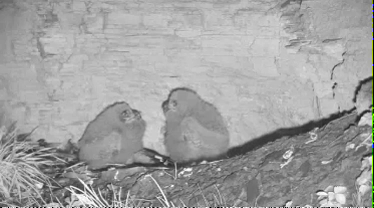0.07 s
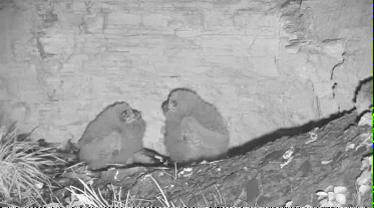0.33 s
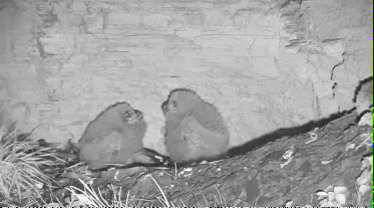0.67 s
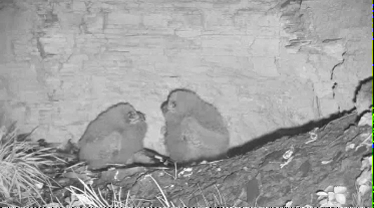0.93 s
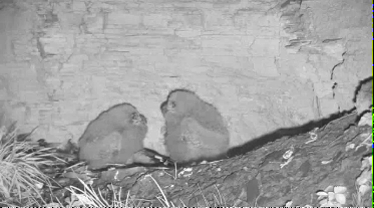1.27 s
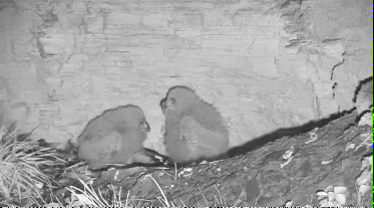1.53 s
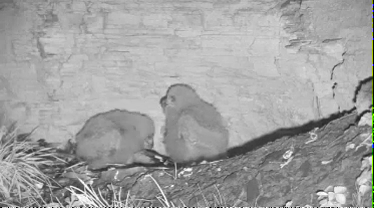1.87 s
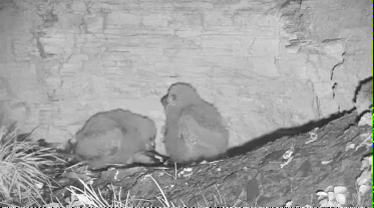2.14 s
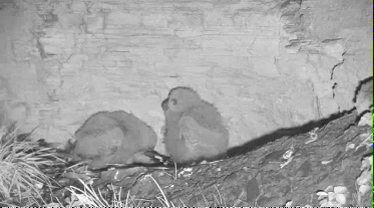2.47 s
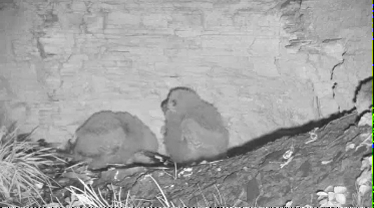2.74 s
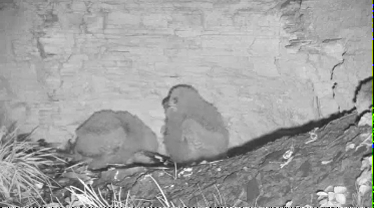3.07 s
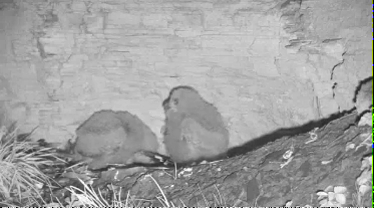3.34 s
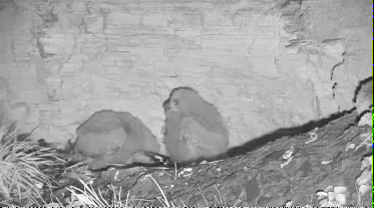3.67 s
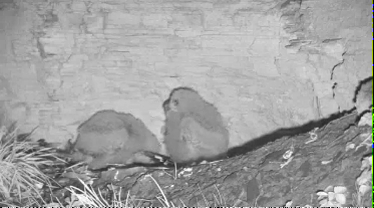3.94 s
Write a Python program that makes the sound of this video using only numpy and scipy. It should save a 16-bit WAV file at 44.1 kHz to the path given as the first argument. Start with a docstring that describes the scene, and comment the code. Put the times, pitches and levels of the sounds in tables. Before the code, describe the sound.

Songbirds sing some way off near a cliff ledge: a few chirps, then a quick run of whistles and trills, then harsh rasps. The song echoes lightly over a far chorus, with faint microphone hiss and hum.

```python
"""On a cliff ledge, songbirds call some way off. One sings whistles (frequency glides) that break
into trills (amplitude and frequency modulation), with harsh rasps (air puffs exciting a resonance)
before and after. Reflection from rock and trees returns the song over a far chorus.
The fixed microphone adds steady hiss, mains hum and a thin rectifier buzz."""
import sys
import numpy as np
from scipy import signal
from scipy.fft import rfft, irfft
from scipy.io import wavfile
from scipy.ndimage import uniform_filter1d

SR = 44100
rng = np.random.default_rng(int(sys.argv[2]) if len(sys.argv) > 2 else 0)


def unload_audio(sound):
    """Save the sound as a 16-bit wav file, at the path given as the first command line argument."""
    columns = np.transpose(np.atleast_2d(sound))
    # keep every value between -1 and 1, then stretch to whole-number steps
    steps = np.round(np.clip(columns, -1, 1) * 32767)
    wavfile.write(sys.argv[1], SR, steps.astype(np.int16))


N = 176400
T = np.arange(N) / SR


# Slurred pure notes: onset t/s, duration t/s, first f/Hz, middle f/Hz, last f/Hz, level/dB
WHISTLE_NOTES = [ (0.182, 0.018, 3700, 3900, 3950, -56), (.224, 0.017, 3800, 3780, 3820, -55),
                 (0.266, 0.016, 3950, 4030, 4140, -57), (0.302, .012, 4500, 4470, 4430, -60),
                 (0.389, 0.022, 3950, 4080, 3980, -58), (0.404, 0.03, 2950, 2882, 3000, -50),
                 (.442, 0.021, 2930, 2847, 2850, -44), (0.498, 0.056, 2270, 2207, 2260, -56),
                 (.636, 0.031, 3590, 3580, 3570, -58), (0.639, 0.027, 2870, 2807, 2800, -53.5),
                 (.692, 0.068, 2870, 2880, 2900, -50), (.835, 0.036, 2860, 2904, 2900, -57.5),
                 (.928, 0.029, 2853, 2862, 2800, -51), (1.226, 0.017, 2760, 2880, 2920, -54.5),
                 (1.407, .036, 2110, 2188, 1900, -49), (1.475, 0.0097, 2060, 1880, 1810, -51.5),
                 (1.5, 0.037, 3300, 3220, 3140, -61), (1.559, 0.065, 1980, 2080, 2055, -53.5),
                 (1.615, 0.082, 2070, 2004, 1940, -51), (1.614, 0.061, 2580, 2413, 2316, -41),
                 (1.677, 0.037, 2372, 2750, 2606, -39.5), (1.717, 0.021, 2200, 2320, 2320, -47.5),
                 (1.749, 0.022, 2180, 2357, 2440, -43.5), (1.772, 0.069, 2536, 2512, 2523, -44.5),
                 (1.834, 0.0627, 2489, 2496, 2530, -40), (1.784, .028, 3600, 3620, 3500, -62.5),
                 (1.865, 0.02, 4110, 4000, 4040, -59.5), (1.926, 0.021, 4030, 4240, 3970, -55),
                 (2.01, 0.013, 5000, 4860, 4860, -59.5), (2.018, 0.027, 2486, 2622, 2970, -46),
                 (2.272, .085, 1650, 1630, 1643, -62), (2.594, 0.071, 1643, 1616, 1603, -56.5),
                 (2.678, .06, 1540, 1486, 1485, -62.5), (2.743, 0.028, 1480, 1444, 1420, -56.5),
                 (2.789, 0.043, 2694, 2716, 2690, -51.5), (2.837, .06, 2700, 2890, 2924, -52),
                 (3.065, 0.011, 3460, 3870, 4530, -52.5), (3.23, .024, 3120, 2956, 3000, -43),
                 (3.463, 0.0041, 3020, 3000, 3040, -31), (3.848, 0.069, 4240, 4310, 4270, -66)]
def whistle(length, first_hz, middle_hz, last_hz, db):
    """Frequency glide: a pure tone follows a parabola through three pitches."""
    _, progress, envelope = syllable(length)
    parabola = np.polyfit([0, .5, 1], [first_hz, middle_hz, last_hz], 2)
    return amp(db) * envelope * unit(tone(np.polyval(parabola, progress)))


# Trilled notes: onset t/s, duration t/s, first f/Hz, last f/Hz, level/dB,
# modulation f/Hz, deviation f/Hz, amplitude modulation depth (0-1)
TRILL_NOTES = [ (0.037, 0.041, 3112, 2930, -37, 130, 70, 0.57), (0.087, .03, 2867, 2820, -41, 99, 70, 0.4),
               (1.554, 0.064, 2955, 2620, -42.5, 54, 109, 0.1),
               (1.769, 0.12, 1933, 1625, -55.5, 61, 60, 0.3),
               (1.872, 0.045, 2120, 2270, -49, 72.7, 120, 0.9), (1.9, 0.072, 2265, 2184, -44, 72, 99, 0.2),
               (2.037, 0.075, 2884, 2983, -40, 78, 173, 0.54),
               (2.185, 0.072, 2925, 3060, -42.5, 90, 219, 0.5),
               (2.287, 0.09, 2012, 1990, -48, 66, 59.5, 0.14),
               (2.368, .11, 2017, 1886, -44.5, 49.4, 30, 0.5),
               (2.361, 0.087, 2980, 3010, -46.5, 88, 278, 0.65),
               (2.48, 0.058, 1869, 1805, -54.5, 62, 25, .4),
               (2.489, 0.073, 2790, 2780, -49.5, 67, 111, 0.5),
               (2.561, .13, 2857, 2927, -52.5, 62, 232, 0.15), (3.248, 0.037, 2770, 2644, -47, 72, 101, .4),
               (3.284, 0.028, 2806, 2775, -41.5, 92, 120, 0.1)]
def trill(length, first_hz, last_hz, db, rate_hz, deviation_hz, depth):
    """Amplitude and frequency modulation at one rate: each pulse sweeps upward as it fades."""
    t, progress, envelope = syllable(length)
    phase = 2 * np.pi * rate_hz * t + 0.39 * wander(len(t), hz=51)
    carrier_hz = first_hz + (last_hz - first_hz) * progress
    hz = carrier_hz - deviation_hz * np.sin(phase - 0.41)  # the sweep lags the pulse
    pulses = 1 - depth * np.cos(phase)
    return amp(db) * envelope * unit(pulses * tone(hz))


# Harsh calls: onset t/s, duration t/s, first f/Hz, last f/Hz, level/dB, bandwidth per stage f/Hz
RASP_CALLS = [ (0.033, 0.035, 3180, 3050, -43, 600), (0.074, 0.036, 2900, 2800, -46, 597),
              (0.114, 0.082, 2840, 2830, -46.5, 540), (.21, .12, 2930, 2910, -52.5, 400),
              (0.493, 0.01, 4170, 3500, -54, 800), (2.102, 0.0078, 4300, 4300, -53, 610),
              (2.195, 0.01, 4460, 3900, -55, 596), (2.329, .016, 3750, 3660, -55.5, 400),
              (2.385, 0.028, 3820, 3800, -57, 400), (2.3, 0.22, 2520, 2510, -55.5, 500),
              (2.569, 0.21, 2490, 2610, -54.5, 500), (2.849, .18, 2540, 2520, -56.5, 400),
              (3.03, .19, 2920, 2820, -56, 353), (3.076, .14, 3960, 3950, -58.5, 900),
              (3.282, .04, 3600, 3500, -51, 250), (3.336, .06, 2850, 3000, -45.5, 450),
              (3.365, 0.061, 3670, 3580, -51, 500), (3.396, .095, 2950, 3040, -41.5, 450),
              (3.44, 0.15, 2320, 2410, -52.5, 700), (3.491, 0.096, 3020, 2850, -42.5, 460),
              (3.573, 0.068, 3630, 3600, -50, 800), (3.602, 0.11, 3070, 3250, -50, 450),
              (3.703, 0.085, 2920, 3260, -48, 396)]
def rasp(length, first_hz, last_hz, db, width_hz, puff_hz=125, air_width_hz=1300):
    """Source and filter: uneven puffs of air excite a resonance of the bird's throat."""
    t, progress, envelope = syllable(length)
    cycles = np.cumsum(puff_hz * (1 + .3 * wander(len(t), hz=100))) / SR
    puffs = np.exp(-(cycles % 1) / 0.56) * rng.standard_normal(SR // 2)[:len(t)]
    hz = first_hz + (last_hz - first_hz) * progress
    ring, air = (unit(resonate(resonate(puffs, hz, w), hz, w)) for w in (width_hz, air_width_hz))
    return amp(db) * envelope * unit(ring + amp(-22.5) * air)


def near_birds():
    """Superposition: the whistles, trills and rasps add, each from its own onset."""
    song = np.zeros(N)
    for voice, table in ((whistle, WHISTLE_NOTES), (trill, TRILL_NOTES), (rasp, RASP_CALLS)):
        for onset, *note in table:
            add(song, onset, voice(*note))
    return song


def cliff_echo(song, t60_s=0.87, build_s=0.015, tail_db=-6, early_db=-9.5, early_spread_s=.025):
    """Reverberation: early reflections off rock and a diffuse, decaying tail from rock and trees."""
    t = T[:int(1.5 * SR)]
    tail = rng.standard_normal(len(t)) * (1 - np.exp(-t / build_s)) * 10 ** (-3 * t / t60_s)
    response = amp(tail_db) * tail / np.linalg.norm(tail)
    reflections = rng.random(size=(12, 2))
    for lag, polarity in reflections:
        delay = int((lag + .1) * early_spread_s * SR)
        response[delay] += np.sign(polarity - .5) * amp(early_db) / np.sqrt(len(reflections))
    return signal.fftconvolve(song, response)[:N]


def far_birds(notes_per_s=14, centre_hz=2858, spread_hz=35.7, mean_length_s=0.0363):
    """Random scatter in time and frequency: faint pips from distant birds, all near one pitch."""
    pips = np.zeros(N)
    for slot in np.arange(0, N / SR, 1 / notes_per_s):
        lag, stretch = rng.random(2)
        pitches = centre_hz + spread_hz * rng.standard_normal(3)
        add(pips, slot + lag / notes_per_s, whistle(mean_length_s * (.5 + stretch), *pitches, db=-60))
    return pips


# Spectrum of the far chorus: f/Hz, relative spectral level/dB
CHORUS_SPECTRUM = [(1200, -38), (1700, -21), (2200, -11), (2450, -11), (2700, -8), (2880, -3), (3050, -3),
                   (3300, -13.5), (3700, -14), (4600, -22.5), (7000, -38.5)]
def far_chorus():
    """Incoherent sum: distant song merges into a fluctuating noise band, strongest near 3 kHz."""
    return shaped_noise(CHORUS_SPECTRUM, db=-56.5, patchy_db=3)


# Spectrum of the microphone's hiss: f/Hz, relative spectral level/dB
HISS_SPECTRUM = [(20, -4), (130, -3.5), (300, -2), (700, -0.5), (1300, 0.5), (3000, 1.5), (5000, -4),
                 (7000, -6), (10000, -11), (14000, -15.5), (15800, -22)]
def microphone_hiss():
    """Broadband noise: a steady floor that falls away above 3 kHz."""
    return shaped_noise(HISS_SPECTRUM, db=-62.5, patchy_db=0.9)


# Partials of the hum: f/Hz, relative level/dB
HUM_PARTIALS = [(50, -61.5), (100, -75), (200, -82), (300, -83), (400, -84), (600, -82), (720, -75)]
def mains_hum(gain_db=-2.5):
    """Line spectrum: the mains fundamental and weaker partials, each at a random phase."""
    return np.sqrt(2) * sum(amp(db + gain_db) * np.cos(2 * np.pi * (hz * T + rng.random()))
                            for hz, db in HUM_PARTIALS)


# Spectral envelope of the buzz: f/Hz, level/dB for the upper line of each pair
BUZZ_ENVELOPE = [(250, -90.5), (650, -84.5), (1200, -83), (2500, -71.5), (3600, -72), (4500, -77.5),
                 (5500, -79), (6400, -85.5), (7500, -97), (12000, -100)]
def rectifier_buzz(mains_hz=50, lower_line_db=-6):
    """Six-pulse rectification: a pair of harmonics flanks every sixth multiple of the mains frequency."""
    phase = 2 * np.pi * np.arange(SR // mains_hz) * mains_hz / SR
    period = sum(amp(level_at(BUZZ_ENVELOPE, k * mains_hz) + db) * np.cos(k * phase)
                 for centre in range(6, 240, 6)
                 for k, db in ((centre + 1, 0), (centre - 1, lower_line_db)))
    return np.sqrt(2) * np.resize(period, N)


def syllable(length, attack_s=0.0038, release_s=0.0032, swell_db=1):
    """Amplitude envelope: attack, gentle swell, release. Returns time, progress (0-1) and envelope."""
    t = np.arange(0, length + release_s / 2, 1 / SR)
    progress = np.minimum(t / length, 1)
    ramp = np.clip(np.minimum(t / attack_s, (t[-1] - t) / release_s), 0, 1)
    swell = amp(swell_db * (np.sin(np.pi * progress) - 2 / np.pi))
    return t, progress, np.sin(np.pi / 2 * ramp) ** 2 * swell


def tone(hz, jitter=0.0064):
    """Phase as the integral of frequency: a sine wavers slightly about the curve hz."""
    unsteady_hz = hz * (1 + jitter * wander(len(hz), hz=115))
    return np.sin(2 * np.pi * np.cumsum(unsteady_hz) / SR)


def resonate(drive, hz, width_hz):
    """Forced, damped resonance whose centre frequency follows the curve hz."""
    phasor = np.exp(2j * np.pi * np.cumsum(hz) / SR)
    pole = np.exp(-np.pi * abs(width_hz) / SR)
    return 2 * (phasor * signal.lfilter([1 - pole], [1, -pole], drive / phasor)).real


def shaped_noise(spectrum, db, patchy_db, size=1024):
    """Spectral shaping: Gaussian noise with patches that swell and fade in time and frequency."""
    hz = np.fft.rfftfreq(size, 1 / SR)
    real, imag, patches = rng.standard_normal((3, 4 * N // size + 5, len(hz)))
    patches = unit(uniform_filter1d(uniform_filter1d(patches, size=9, axis=0), size=6, axis=1))
    frames = (real + 1j * imag) * amp(level_at(spectrum, hz) + patchy_db * patches)
    _, noise = signal.istft(frames.T, nperseg=size, noverlap=size - size // 4)
    return amp(db) * unit(noise[:N])


def wander(n, hz):
    """Low-pass noise: a smooth fluctuation of rms about 1 that rolls off around hz."""
    f = np.fft.rfftfreq(SR // 2, 1 / SR)
    white = rfft(rng.standard_normal(SR // 2))
    return unit(irfft(white * np.exp(-(f / hz) ** 2)))[:n]


def level_at(spectrum, hz):
    """Interpolation of level on a logarithmic frequency axis."""
    f, db = np.transpose(spectrum)
    return np.interp(np.log(hz + 1), np.log(f + 1), db)


def amp(db):
    """Amplitude ratio from level/dB."""
    return 10 ** (np.asarray(db) / 20)


def unit(x):
    """Normalisation to rms 1."""
    return x / np.sqrt(np.mean(x ** 2) + 1e-20)


def add(mix, onset_s, sound):
    """Superposition of a sound on the mix, from its onset."""
    part = mix[max(round(onset_s * SR), 0):][:len(sound)]
    part += sound[:len(part)]


def scene():
    """Superposition of direct and reflected song on the far chorus, hiss, hum and buzz."""
    song = near_birds() + far_birds()
    background = far_chorus() + microphone_hiss() + mains_hum() + rectifier_buzz()
    return (song + cliff_echo(song) + background)[None]


def record(dry):
    """Low-pass filtering: the highest treble is cut off. The sound starts after a brief silence."""
    silence_s, cutoff_hz = .035, 15800
    low_pass = signal.firwin(511, cutoff_hz, window=("kaiser", 9), fs=SR)
    return signal.oaconvolve(dry * (T >= silence_s), low_pass[None], "same")


dry = scene()
out = record(dry)
unload_audio(out)
```